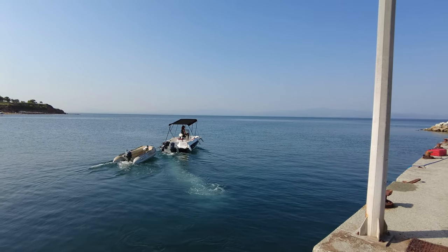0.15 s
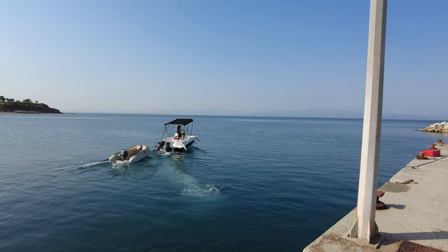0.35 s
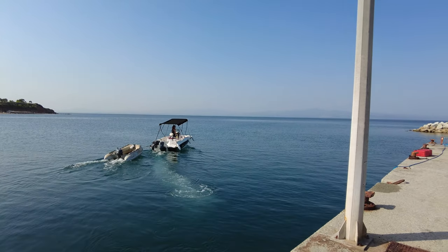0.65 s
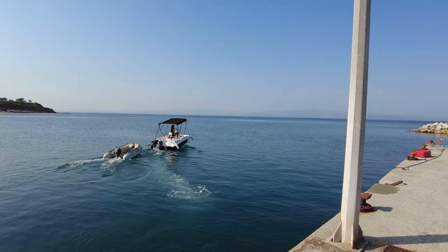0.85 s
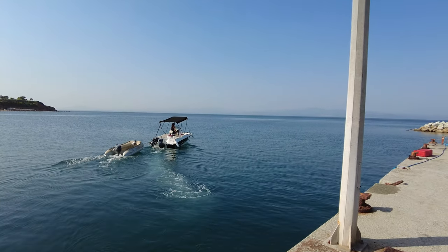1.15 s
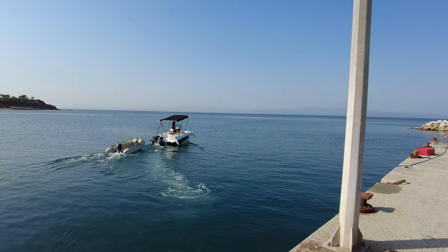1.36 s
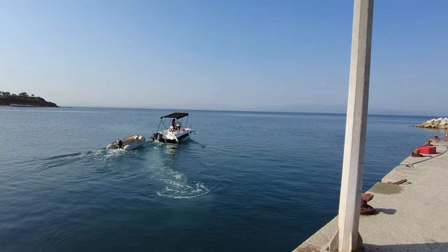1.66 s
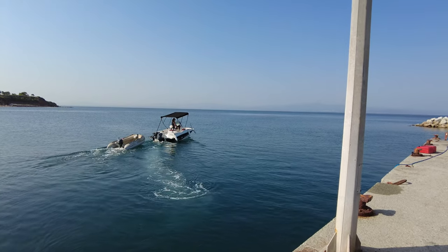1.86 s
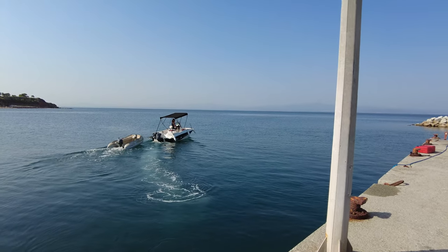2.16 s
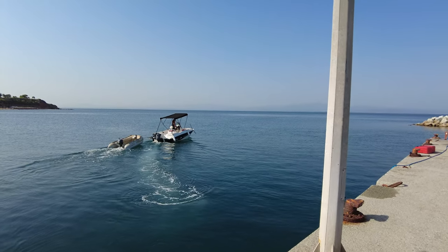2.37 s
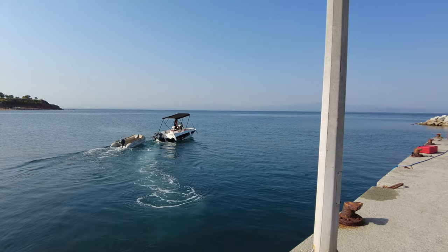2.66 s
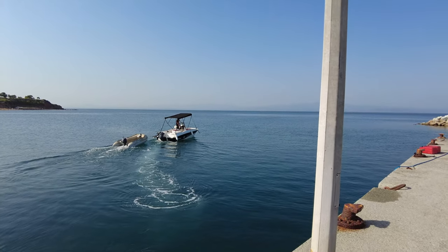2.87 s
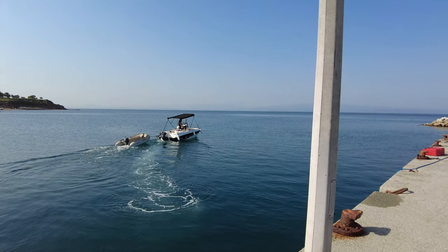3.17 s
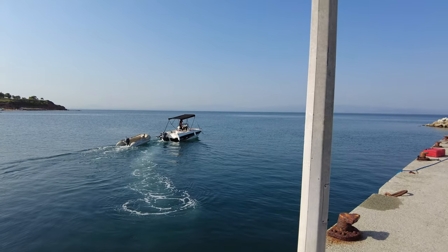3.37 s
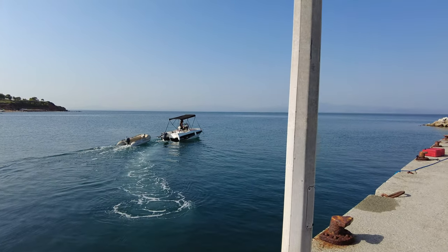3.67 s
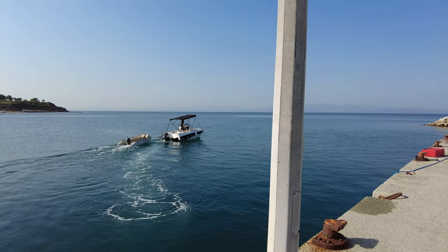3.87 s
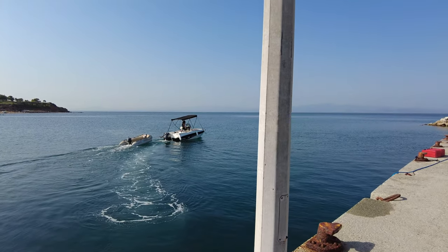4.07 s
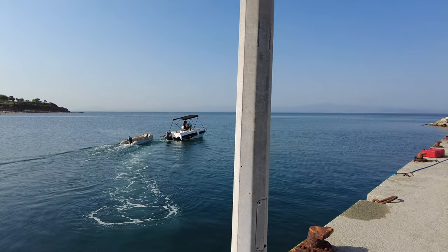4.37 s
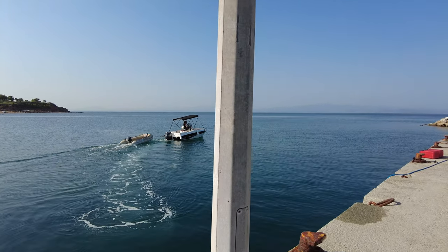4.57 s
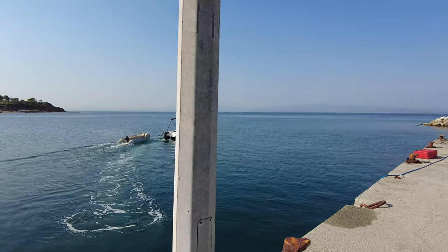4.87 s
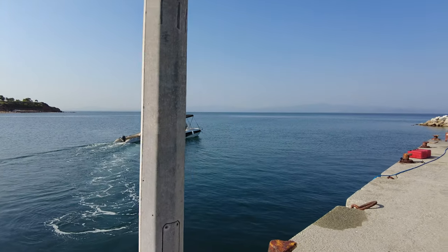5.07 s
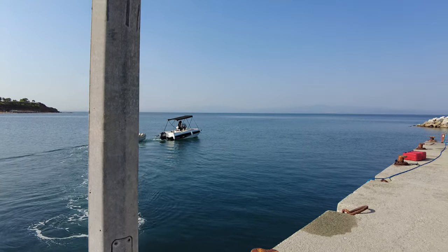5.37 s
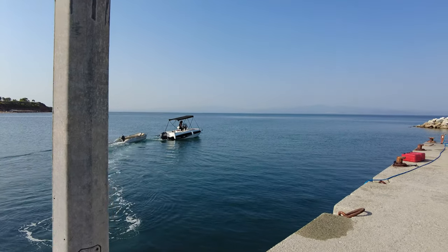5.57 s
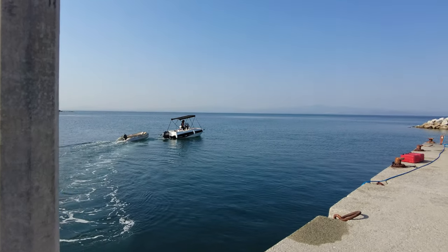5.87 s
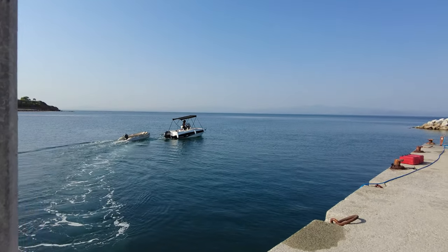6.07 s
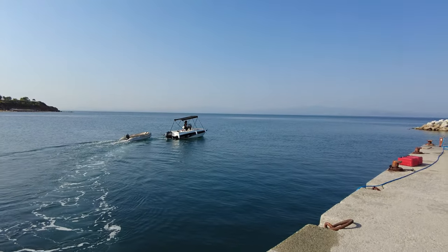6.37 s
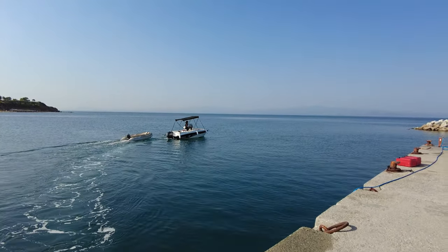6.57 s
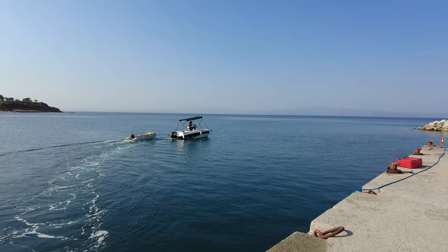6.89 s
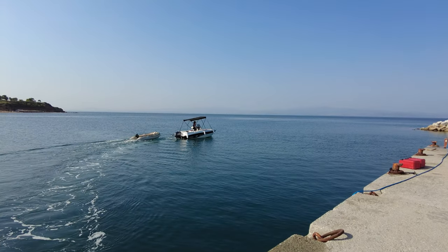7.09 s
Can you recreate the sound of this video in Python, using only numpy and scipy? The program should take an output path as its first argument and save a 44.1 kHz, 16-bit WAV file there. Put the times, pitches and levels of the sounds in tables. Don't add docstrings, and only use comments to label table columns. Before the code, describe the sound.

A small outboard boat draws away from a stone quay, its low, slightly uneven drone beating over a watery exhaust burble. The wake churns, splashes and softly hisses; wavelets cluck and drops tick nearby. Around five seconds a post dulls the boat while wind thumps the hand-held microphone. A faint machine hum and a distant cicada sit behind it all.

```python
import sys
import numpy as np
from scipy import signal
from scipy.fft import rfft, irfft, next_fast_len
from scipy.io import wavfile
from scipy.ndimage import uniform_filter1d, map_coordinates

SR = 44100
rng = np.random.default_rng(int(sys.argv[2]) if len(sys.argv) > 2 else 0)


def how_loud(loudness_db):
    steps = np.asarray(loudness_db, float) / 20
    return 10 ** steps


def output_pcm(signal):
    pcm = np.clip(np.atleast_2d(signal).T, -1, 1) * 32767
    wavfile.write(sys.argv[1], SR, np.round(pcm).astype(np.int16))


N = 318843
RECEDE_DB_PER_S = -0.42

# middle t/s, half length/s, lift of the buffeting/dB, lift of the exhaust boom/dB
GUSTS = [(0.3, 0.7, 8, -1), (0.12, 0.11, -4, 5.5), (1.38, 0.19, -5, 4), (2.2, 0.069, 3, 1.5),
         (2.75, 0.25, 0, -3), (3.7, 0.28, 4.5, 1), (4.45, 0.2, 8, 4.5), (4.85, 0.15, 11.5, 7),
         (5.15, 0.15, 10.5, 2), (5.9, 0.1, 0, 2), (6.6, 0.068, -1.5, 3.5), (5.48, 0.08, 8.5, 4),
         (6.0, 0.21, 5.5, 2.5), (6.5, 0.17, 2, 1), (6.9, 0.33, -3, -1)]


def unit(x):
    return x / np.sqrt(np.mean(x ** 2) + 1e-20)


def along(points, hz):
    f, value = np.transpose(points)
    return np.interp(np.log(hz + 1), np.log(f + 1), value)


def curves(rows):
    s, *columns = np.transpose(rows)
    return [np.interp(np.arange(N) / SR, s, c) for c in columns]


def swells(rows):
    s, half, *lifts = np.transpose(rows)
    coarse = np.arange(0, N + 64, 64) / SR
    bells = np.exp(-((coarse[:, None] - s) / np.abs(half)) ** 2)
    return [np.interp(np.arange(N) / SR, coarse, bells @ db) for db in lifts]


def wobble(rate):
    coarse = np.arange(0, N + 32, 32)
    knots = rng.standard_normal(int(N * rate / SR) + 4)
    smooth = map_coordinates(knots, [coarse * rate / SR])
    return np.interp(np.arange(N), coarse, smooth)


def filtered(x, response):
    m = next_fast_len(N + SR // 2)
    return irfft(rfft(x, m) * response(np.fft.rfftfreq(m, 1 / SR)), m)[..., :N]


def rush(spectrum, patchy_db):
    # f/Hz, likeness of the two ports (0-1)
    likeness = [(100, 1), (300, 0.83), (550, 0.66), (800, 0.93), (1150, 0.55), (1330, 1), (1900, 0.9),
                (2300, 0.34), (2700, 0.91), (3600, 0.12), (6000, 0.37), (12000, 0.041)]
    noise = signal.stft(rng.standard_normal((2, N)), nperseg=512)[2]
    patches = uniform_filter1d(rng.standard_normal(noise.shape[1:]), size=6, axis=0)
    patches = unit(uniform_filter1d(patches, size=10, axis=1))
    pair = signal.istft(noise * how_loud(patchy_db * patches), nperseg=512)[1][:, :N]

    def response(hz):
        turn = np.arccos(np.clip(along(likeness, hz), 0, 1)) / 2
        return how_loud(along(spectrum, hz)) * [np.cos(turn), np.sin(turn)]

    mid, side = filtered(pair, response)
    return unit(np.array([mid + side, mid - side]))


def plink(hz, cycles):
    life = np.clip(cycles, .5, 12) / hz
    u = np.arange(int(3 * life * SR)) / SR / life
    ring = np.sin(2 * np.pi * cycles * u * (1 + 0.032 * u))
    soft_start = 1 - np.exp(-(5.0 * u) ** 2)
    return ring * soft_start * np.exp(.5 - 2 * u)


def plinks(rows):
    out = np.zeros((2, N + SR))
    for s, db, hz, cycles, pan_db in rows:
        drop = how_loud(db + 5.0) * plink(hz, cycles)
        out[:, round(s * SR):][:, :len(drop)] += how_loud([[pan_db / 2], [-pan_db / 2]]) * drop
    return out[:, :N]


def shade():
    post_times = [
        4.3,
        5.0,
        6.2,
        6.65,
    ]
    return np.interp(np.arange(N) / SR, post_times, (0, 1, 0.99, 0))


def motor():
    # t/s, shaft turns/Hz, level of the firing tone (order 2)/dB
    running = [(0, 47.2, -38), (.34, 48.08, -30.5), (.55, 48.12, -34), (1.0, 48.35, -36.5),
               (1.55, 48.85, -31), (1.8, 49.3, -38), (2.7, 49.41, -36), (3.0, 49.54, -40.5),
               (3.68, 49.96, -33), (3.92, 49.56, -45), (4.15, 49.61, -36), (4.45, 48.6, -47),
               (4.76, 49.4, -37), (5.05, 50.71, -38), (5.35, 50.71, -49), (6.0, 50.37, -48.5),
               (6.45, 50.1, -51), (7.23, 49.75, -45.5)]
    orders_away = [(1, -44.5, 0.04), (3, -47.5, -1.52), (4, -55.5, -1.14), (2.5, -61, 0.3),
                   (1.7, -63, 0.14)]
    upper_orders = [(5, -20), (6, -18), (8, -21.5)]
    # shaft order, middle t/s, half length/s, lift/dB
    flares = [(1, 0.14, 0.42, 3), (1, 0.92, 0.37, 4), (4, 0.93, 0.27, 7.5), (4, 2.55, 0.61, 8),
              (4, 3.75, 0.1, 14), (4, 4.265, 0.37, 14.5), (4, 4.8, 0.12, 10), (4, 5.35, 0.16, 12.5),
              (3, 0.68, 0.27, 1.5), (3, 4.4, 0.3, 5.5), (3, 6.9, 0.091, 5), (3, 2.7, 0.4, 0.5),
              (4, 3.47, 0.042, 7.5), (4, 4.58, 0.04, -8), (4, 6.5, 0.5, 3), (4, 1.55, 0.18, 4),
              (4, 4.75, 0.1, 2.5), (3, 1.69, 0.15, 3.5), (3, 5.15, 0.1, -2), (1.7, 4.9, 0.1, 15),
              (3, 6.01, 0.4, 4), (3, 0.027, 0.084, 7), (3, 0.88, 0.042, 4), (3, 1.75, 0.27, -6),
              (3, 3.28, 0.066, 6), (3, 3.6, 0.27, -5), (3, 7.05, 0.14, 10), (1, 0.86, 0.037, -18),
              (1, 1.974, 0.056, -13), (1, 3.05, 0.052, -12), (1, 1.35, 0.13, 4.5), (2, 1.97, 0.024, -6),
              (2, 2.15, 0.039, -4), (2, 4.79, 0.046, 6), (2, 4.87, 0.04, -11), (2, 5.15, 0.06, -3.5),
              (2, 7.4, 0.06, 12), (2, 5.02, 0.06, 2), (1, 6.77, 0.27, -1), (1, 5.7, 0.13, 1),
              (3, 5.2, 0.16, -6), (3, 6.45, 0.11, 6), (2, 4.35, 0.056, -2), (2, 2.47, 0.088, 1),
              (2, 0.95, 0.037, -2.5), (4, 2.01, 0.2, -0.5), (4, 0.5, 0.16, 2), (2, 7.15, 0.047, 8),
              (2.5, 1.38, 0.22, 17.5), (2.5, 3.15, 0.06, 7), (2.5, 5.85, 0.089, 12.5),
              (1.7, 3.57, 0.066, 24), (1.7, 3.99, 0.044, 25), (1.7, 6.55, 0.14, 21.5),
              (1.7, 6.85, 0.09, 19.5),
              (3, 6.9, 0.081, 5), (3, 2.7, 0.35, 1.5), (4, 3.47, 0.05, 7.5), (4, 4.58, 0.04, -8),
              (4, 6.5, 0.42, 3), (4, 1.55, 0.18, 4), (4, 4.75, 0.1, 2.5), (3, 1.69, 0.15, 3.5),
              (3, 5.15, 0.1, -2), (1.7, 4.9, 0.1, 15)]
    t = np.arange(N) / SR
    turns, firing_db = curves(running)
    turns = uniform_filter1d(turns, size=SR // 5)
    angle = 2 * np.pi * np.cumsum(turns * (1 + 0.0015 * wobble(12))) / SR
    uneven = 0.5 * wobble(14)

    def lift(order):
        return swells([row[1:] for row in flares if row[0] == order])[0]

    levels = {2: firing_db + lift(2)}
    for order, db, db_per_s in orders_away:
        levels[order] = db + db_per_s * t + lift(order)
    for order, db in upper_orders:
        levels[order] = levels[3] + db
    drone = np.zeros(N)
    for order, db in levels.items():
        unsteady_db = db + 0.69 * wobble(9) + 0.75 * wobble(22)
        phase = order * angle + 0.201 * order * order + (order == 1) * uneven
        drone -= np.sqrt(2) * how_loud(unsteady_db) * np.cos(phase)
    return drone + exhaust(angle)


def exhaust(angle):
    # f/Hz, level/(dB per Hz)
    boom_spectrum = [(30, -12.5), (65, 0), (120, -1), (180, -7), (260, -33), (500, -120)]
    # f/Hz, level/(dB per Hz)
    burble_spectrum = [(120, -23), (200, 0.5), (260, -3.5), (330, -5.5), (450, -9.5), (600, -36.5),
                       (1200, -120)]
    # middle t/s, half length/s, lift/dB
    gulps = [(0.04, 0.043, 3), (2.98, 0.1, 3.5), (1.2, 0.06, 2), (1.7, 0.06, 1), (0.38, 0.13, 4.5),
             (0.9, 0.06, 3), (1.85, 0.086, 3), (2.4, 0.29, 0.5), (3.2, 0.084, 1.5), (3.42, 0.073, 2.5),
             (4.2, 0.2, 0), (4.56, 0.061, 1.5), (4.95, 0.11, -3.5), (5.15, 0.11, 5), (0.55, 0.1, 2),
             (5.8, 0.099, -0.5), (2.62, 0.08, -2), (5.5, 0.11, 5), (5.9, 0.086, 0), (6.35, 0.068, 3),
             (7.1, 0.1, 0.5)]
    puffs = 1 + 0.36 * np.cos(2 * angle) + 0.16 * np.cos(angle)
    boom_db = -45.5 + swells(GUSTS)[1] + 1.0 * wobble(6.6)
    burble_db = -51.14 + RECEDE_DB_PER_S * np.arange(N) / SR - 2 * shade()
    burble_db = burble_db + swells(gulps)[0] + 1.0 * wobble(5.02)
    boom = how_loud(boom_db) * unit(puffs * rush(boom_spectrum, patchy_db=1.0))
    burble = how_loud(burble_db) * unit(puffs * rush(burble_spectrum, patchy_db=1.0))
    return boom + burble


def wake():
    # f/Hz, level/(dB per Hz)
    churn_spectrum = [(200, -55), (420, -7), (550, -2), (800, 3.5), (900, 0.5), (1100, -12.5), (1500, -36),
                      (3000, -120)]
    # f/Hz, level/(dB per Hz)
    splash_spectrum = [(590, -27), (1000, -3), (1160, -2.5), (1430, -0.5), (1600, -3), (1910, -5),
                       (2060, -9.5), (2980, -11.5), (3580, -17.5), (4000, -20.5), (5200, -39), (8800, -120)]
    # f/Hz, level/(dB per Hz)
    hiss_spectrum = [(2000, -58), (3600, -3), (4450, 5), (5100, 2.5), (6200, 2.5), (7000, -2.5),
                     (7700, -0.5), (9500, -4.5), (12000, -5.5), (15700, -5.5)]
    # middle t/s, half length/s, churn lift/dB, splash lift/dB
    slaps = [(0.0, 0.044, 4.5, 1), (3.5, 0.019, -1, 1.5), (3, 0.032, 2.5, 1), (1, 0.062, 1, 0.5),
             (1.72, 0.05, 3, 0), (5.56, 0.03, 0, 2), (6.75, 0.02, 1, 1), (5.5, 0.03, 2, 1.5),
             (4, 0.078, 2.5, 1.5), (6, 0.22, 3, 2.5), (5.5, 0.14, 3, -1), (6.5, 0.064, 1, -3),
             (1, 0.077, 2, 0.3), (6.5, 0.069, 2, -1), (6.32, 0.047, 2.5, 0.5), (7, 0.027, 4.5, 3.5)]
    # middle t/s, half length/s, lift/dB
    lulls = [(5.41, 0.41, -4.5), (6.85, 0.06, -2), (3.32, 0.15, -2.5), (1.83, 0.16, -2)]
    t = np.arange(N) / SR
    away_db = RECEDE_DB_PER_S * t
    hidden = shade()
    churn_lift, splash_lift = swells(slaps)
    churn_db = -51 + away_db - 7 * hidden + churn_lift
    splash_db = -53.5 + away_db - 1.5 * hidden + splash_lift
    near_db = 2.5 * np.exp(-t / 0.98)
    hiss_db = -64 + away_db + near_db + 1.5 * hidden + swells(lulls)[0] + 1.53 * splash_lift
    surge = wobble(13)
    churn = how_loud(churn_db + 0.36 * surge) * rush(churn_spectrum, patchy_db=2.0)
    splash = how_loud(splash_db + 0.18 * surge) * rush(splash_spectrum, patchy_db=1.0)
    hiss = how_loud(hiss_db + 0.49 * surge + 0.72 * wobble(16)) * rush(hiss_spectrum, patchy_db=1.5)
    return churn + splash + hiss


def wavelets():
    # t/s, peak level/dB, f/Hz, length/cycles, left over right/dB
    clucks = [(0.15, -47, 300, 1.7, 1), (0.901, -42, 340, 2.6, 1), (1.829, -45, 353, 4, -1),
              (0.413, -48, 290, 2.6, 1), (0.3, -49, 430, 6, 1), (0.37, -50, 470, 6, 1),
              (0.47, -49, 403, 6, -1), (0.56, -48, 440, 6, 1), (0.66, -48, 380.4, 6, 1),
              (0.9, -48, 800, 8, -2), (1.12, -49, 700, 8.7, 0), (1.32, -50, 710, 8, 0),
              (1.75, -51, 620, 5, 0), (2.57, -50, 900, 8, 0), (6.97, -48, 800, 7, 0), (0.3, -49, 430, 6, 1),
              (0.37, -50, 470, 6, 1), (0.47, -49, 403, 6, 1), (0.56, -51, 440, 5.6, 1),
              (0.66, -51, 380, 6, 1), (0.9, -49, 800, 8, 0), (1.12, -49, 700, 8.7, 0),
              (1.32, -49, 710, 8, 0), (1.75, -52, 620, 5, 0), (2.57, -50, 900, 8, 0),
              (6.97, -48, 800, 7, 0), (1.4455, -36.5, 560, 5.2, 1), (1.579, -45.5, 274, 3.6, 4),
              (2.009, -36, 530, 3.7, 1), (2.968, -45, 292, 2.2, 0), (3.078, -47, 342, 2, 0),
              (3.615, -54, 770, 2.9, -11), (5.912, -54, 283, 1.7, 1), (6.964, -48.5, 346, 5.4, -2)]
    # t/s, peak level/dB, f/Hz, length/cycles, left over right/dB
    ticks = [(0.5865, -50, 2850, 8, -1), (1.081, -53, 2700, 8, 0), (1.0935, -51, 2950, 10, -1),
             (1.6572, -49, 3200, 1.6, 1), (1.774, -50, 2340, 4, 2), (1.851, -54, 1800, 3, 1),
             (2.0074, -56, 2390, 2.4, 6.5), (2.0081, -54, 5600, 5, 1), (2.9095, -49.5, 3350, 6, 1),
             (2.909, -49, 1900, 4, 0), (2.923, -52, 2700, 3, 0), (2.9695, -44, 1000, 2.6, 0.5),
             (2.9715, -47, 2300, 2, 0.5), (3.0065, -52, 2700, 5, 0), (3.028, -45, 2100, 3, 0),
             (3.0805, -39, 780, 3, 0), (3.0816, -37, 2550, 3.3, -2), (3.110, -52, 1900, 3, 0),
             (3.296, -56, 3900, 5, 0), (3.505, -52, 1750, 4, 0), (3.584, -49, 1600, 4, 0),
             (3.596, -44.5, 1800, 3.5, -0.5), (4.0412, -33, 7200, 4.4, 0), (4.0414, -46, 13000, 4, 0),
             (5.5475, -58, 4050, 9, 1), (5.737, -47, 900, 4, 0), (5.737, -54, 2600, 2, 0),
             (5.782, -46, 800, 5, 0), (5.9128, -41, 1450, 3, -1), (5.9642, -50, 2050, 4, 1.5),
             (5.97, -47, 850, 4, 0), (5.977, -49, 1800, 9, 0), (5.985, -50, 1750, 9, 0),
             (6.0132, -52, 4300, 5, -7), (6.013, -52, 3000, 6, -5), (6.017, -54, 5700, 11, -5),
             (6.018, -50, 2780, 5, -8), (6.755, -55, 3000, 4, 1), (6.9575, -48, 2750, 3, 1.5),
             (6.9575, -56, 4300, 5, 1.5)]
    return plinks([*clucks, *ticks])


def spatter():
    draw = rng.random((int(60 * N / SR), 5))
    out = np.zeros((2, N + SR))
    for when, pitch, size, place, _ in draw[draw[:, 4] < 45 / 60]:
        drop_db = -60 - 1.2 * np.log(size + 0.062)
        drop = how_loud(drop_db) * plink(2600 * np.exp(1.6 * (pitch - .5)), 7.0)[:400]
        sides = how_loud([[6 * (place - .5)], [6 * (.5 - place)]])
        out[:, int(when * N):][:, :len(drop)] += sides * drop
    return out[:, :N]


def breeze():
    # f/Hz, level/(dB per Hz)
    buffet_spectrum = [(8, -4.5), (25, 2), (38, 3), (50, -8.5), (80, -6), (130, -37), (260, -120)]
    # t/s, peak level/dB, f/Hz, length/cycles, left over right/dB
    thumps = [(3.722, -40, 45, 1.7, -2), (4.41, -38, 42, 1.78, 0), (4.58, -27.5, 45.06, 1.7, 0),
              (4.791, -43, 30.02, 1.52, 0), (4.93, -35, 60, 1.98, 0), (5.08, -41, 65, 2, 0),
              (6.38, -37, 52, 2, 0), (6.58, -37, 48.4, 1.8, 0), (6.9, -37, 52, 2, 0),
              (5.04, -28, 45, 1.3, 0), (5.131, -31, 39.8, 1.25, 0), (5.25, -31, 35.02, 1.5, 0),
              (5.35, -31.5, 31.8, 1.5, 0), (5.468, -28, 30, 1.3, 0), (6.015, -27.5, 41.8, 1.2, 0),
              (6.19, -31, 44.8, 1.4, 0)]
    gust_db = -51.5 + 1.39 * np.arange(N) / SR + swells(GUSTS)[0]
    buffeting = how_loud(gust_db + 2.0 * wobble(12)) * rush(buffet_spectrum, patchy_db=1.2)
    return buffeting + plinks(thumps)


def hum():
    # f/Hz, level/dB
    machine_tones = [(434, -65), (861, -64), (1880, -69), (1680, -72.5), (1972, -71)]
    # t/s, level/dB
    machine_swell = [(0, -11), (3.8, -10), (3.93, -2), (4.05, -9), (4.4, -6), (4.7, 1), (4.9, -0.5),
                     (5.2, 4.5), (5.5, -1), (5.9, 1), (6.15, 4.5), (6.3, 1), (6.48, 5.5), (6.7, -0.5),
                     (7.23, -3)]
    t = np.arange(N) / SR
    tones = np.zeros(N)
    for hz, db in machine_tones:
        fuzz = 0.053 * np.sqrt(hz) * wobble(30)
        tones += how_loud(db + 3.1 * wobble(20)) * np.sin(2 * np.pi * hz * t + fuzz)
    return how_loud(curves(machine_swell)[0]) * tones


def insect():
    # t/s, rasp f/Hz
    rasp_pitch = [(0, 4760), (0.8, 4700), (1.2, 4252), (2.6, 4280), (3.6, 4430), (7.23, 4478)]
    song = [(0.1, 0.14, 19), (0.6, 0.12, 12), (1.4, 0.3, 14), (2.3, 0.4, 3), (3.5, 0.2, 5),
            (4.25, 0.16, 13), (4.7, 0.2, 5), (7.0, 0.4, 15)]
    width_hz = 420
    phase = 2 * np.pi * np.cumsum(curves(rasp_pitch)[0]) / SR
    rasp = unit(wobble(width_hz) * np.cos(phase) + wobble(width_hz) * np.sin(phase))
    return how_loud(-88 + swells(song)[0] + 3.5 * wobble(30)) * rasp


def scene():
    return motor() + wake() + wavelets() + spatter() + breeze() + hum() + insect()


def band_limit(x):
    return signal.sosfilt(signal.butter(12, 15670, fs=SR, output="sos"), x)


def record(dry):
    # f/Hz, left over right/dB
    lean = [(60, 0.0), (180, 0.0), (550, 1.5), (1650, 0.5), (4970, 2.5), (15000, 1.5)]
    # f/Hz, lead of the left port/radians
    lead = [(30, 0.1), (70, 0.18), (300, 0.36), (480, 0.66), (620, 1.69), (850, 1.82), (1130, 1.63),
            (1280, 0.53), (2000, 0.51), (3000, 0.56), (15000, 1.5)]

    def both_ports(hz):
        half = how_loud(along(lean, hz) / 2) * np.exp(.5j * along(lead, hz))
        return np.array([half, 1 / half])

    return band_limit(filtered(dry, both_ports))


dry = scene()
out = record(dry)
output_pcm(out)
```